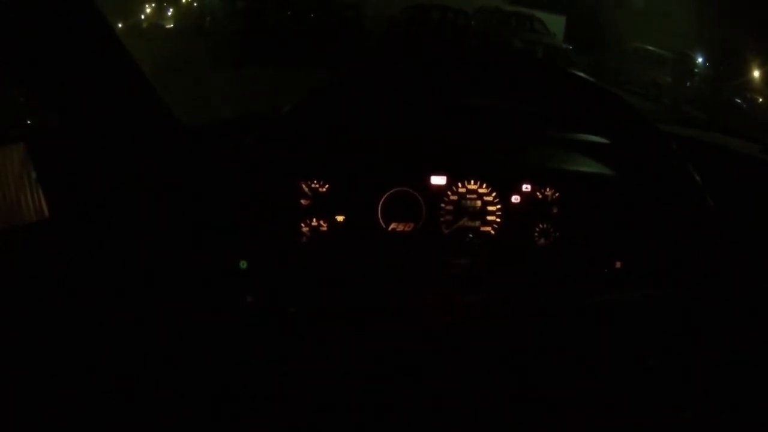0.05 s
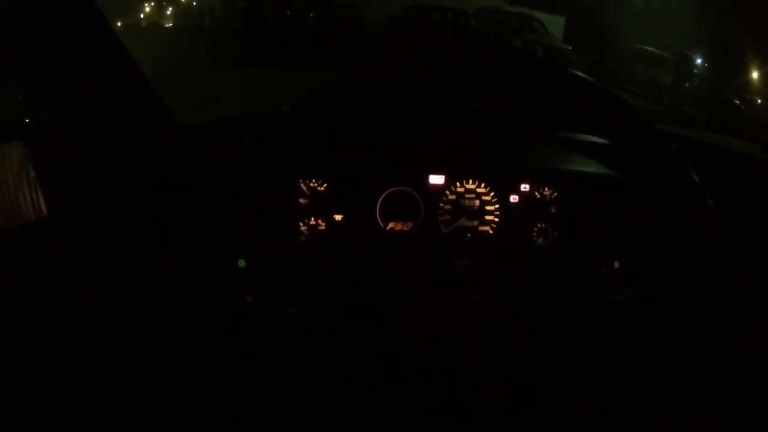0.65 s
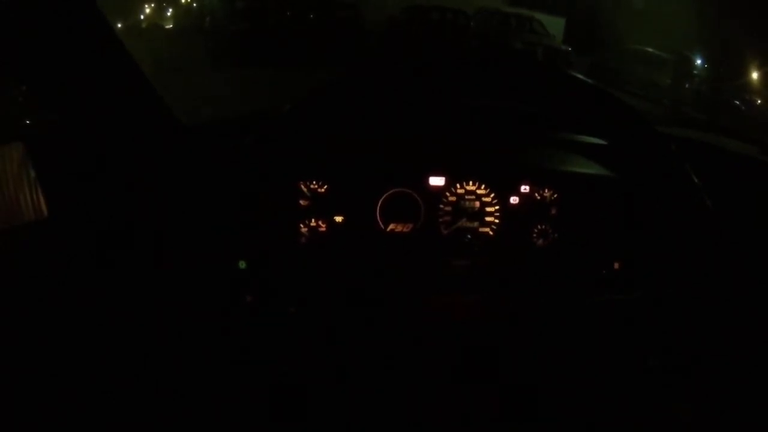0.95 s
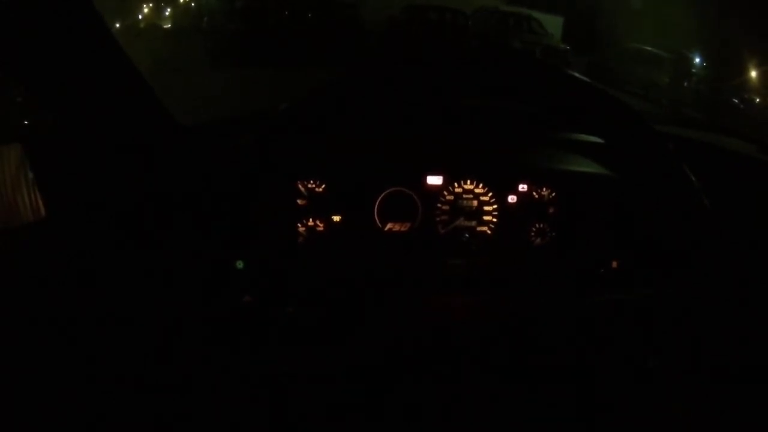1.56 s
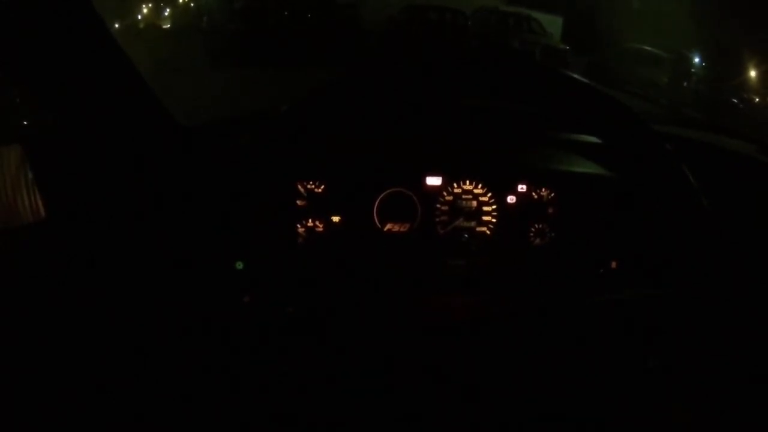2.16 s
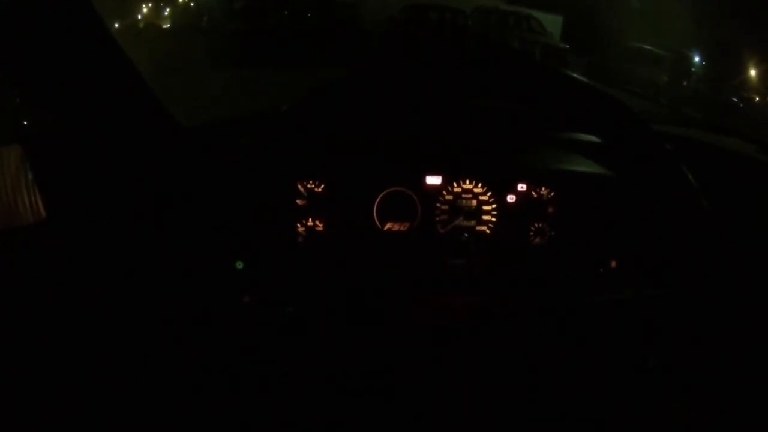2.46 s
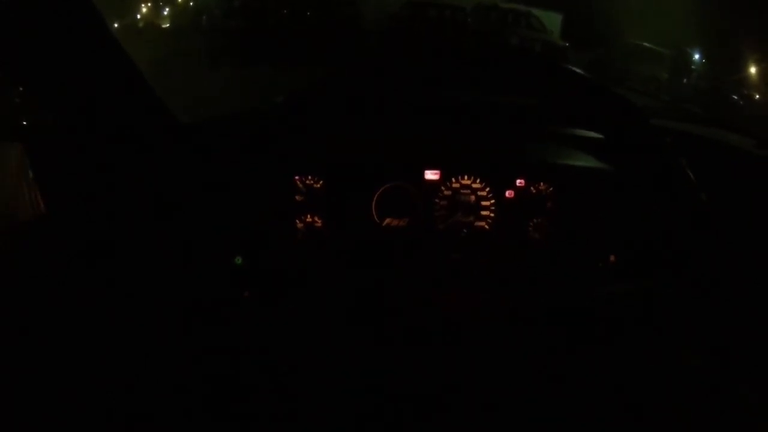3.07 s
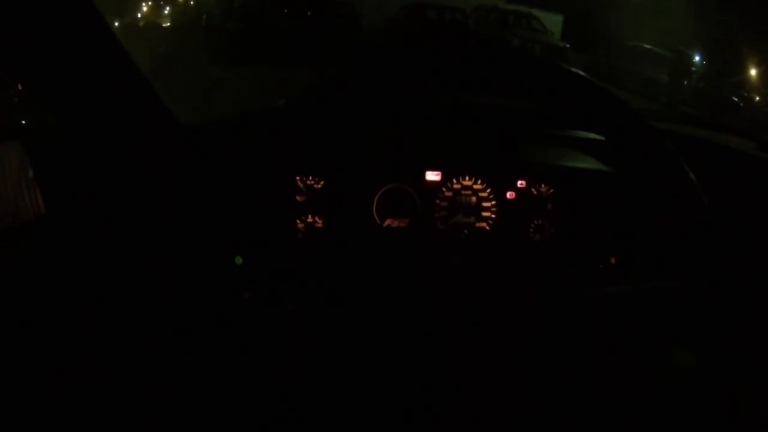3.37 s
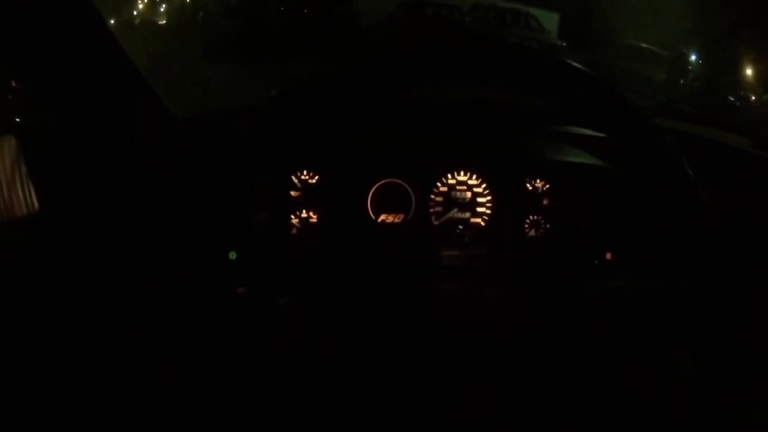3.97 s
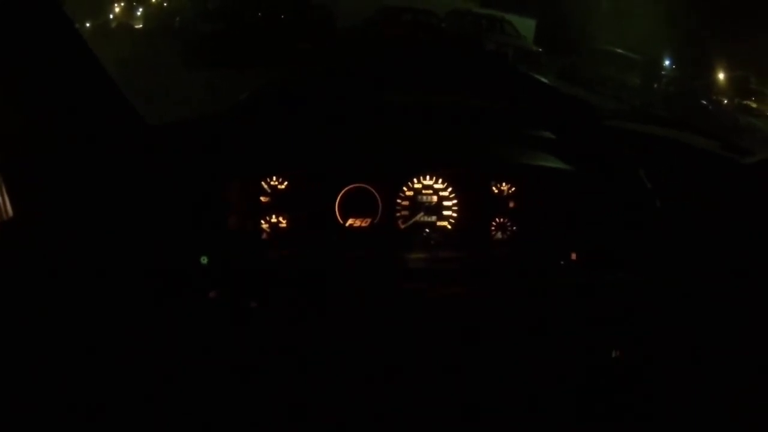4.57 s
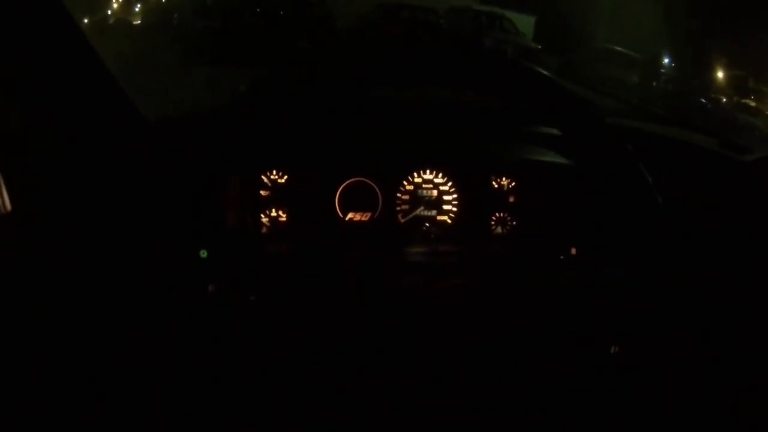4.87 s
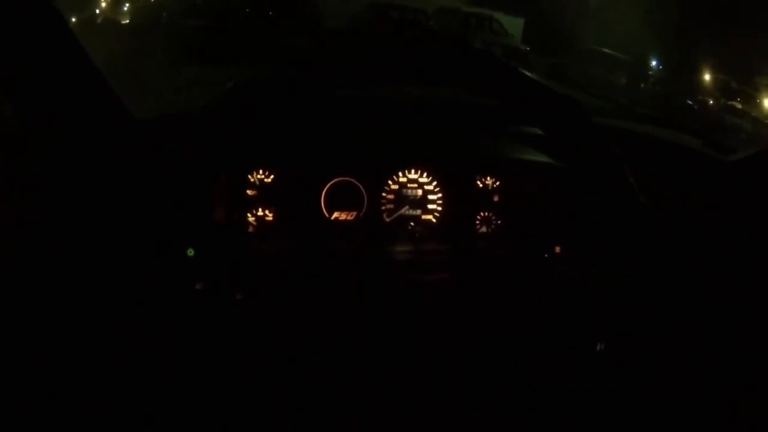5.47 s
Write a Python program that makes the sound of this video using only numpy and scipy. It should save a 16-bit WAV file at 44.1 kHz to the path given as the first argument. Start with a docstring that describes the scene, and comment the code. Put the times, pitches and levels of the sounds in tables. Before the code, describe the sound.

Inside a quiet car, a key turns, the starter cranks, and a diesel engine shudders to life and settles into a low, clattering idle.

```python
"""A faint tick each second over low street rumble, heard from the driver's seat of a closed car.
A key scrapes in the lock and rings the steering column; the starter drones and its gears sing.
The cold four-cylinder diesel stumbles, rocks on its mounts and catches. The key springs back, a relay
snaps, and after one more shudder the engine idles: periodic exhaust pulses make the boom, and the
impacts of combustion make the clatter."""
import sys
import numpy as np
from scipy import signal
from scipy.fft import rfft, irfft
from scipy.io import wavfile
from scipy.ndimage import uniform_filter1d

SR = 44100
rng = np.random.default_rng(int(sys.argv[2]) if len(sys.argv) > 2 else 0)


def transcribe(u):
    """Save the signal u as a 16-bit wav file named by the first command-line argument.

    u: samples, shape (n,) or (channels, n), limited to [-1, 1]; the rate is SR.
    q: integer samples, one column per channel.
    """
    v = np.clip(np.atleast_2d(u).T, -1, 1)
    q = np.round(v * 32767).astype(np.int16)
    wavfile.write(sys.argv[1], SR, q)


N = 243431
T = np.arange(N) / SR
CRANK_S, CATCH_S, RELEASE_S = 2.665, 3.42, 3.73  # starter engages, engine catches, key is let go
KNOCK_FROM_S, SETTLED_S = 4.28, 4.83  # hard knocking begins, idle has evened out


def amp(db):
    """Amplitude ratio of a level in decibels."""
    return 10 ** (np.asarray(db) / 20)


def unit(x):
    """Normalisation to an rms of one."""
    return x / np.sqrt(np.mean(x ** 2) + 1e-20)


def curve(rows):
    """Linear interpolation of (time [s], value) points."""
    return np.interp(T, *np.transpose(rows))


def fade(start, end):
    """Linear ramp, zero at start and one at end; it falls if end comes first."""
    return np.clip((T - start) / (end - start), 0, 1)


def swell(s, width):
    """Gaussian envelope centred on time s."""
    return np.exp(-((T - s) / width) ** 2)


def add(mix, s, sound):
    """Superposition of a sound on the mix at time s."""
    part = mix[max(round(s * SR), 0):][:len(sound)]
    part += sound[:len(part)]


def wander(hz):
    """Random modulation: low-pass noise of unit rms and bandwidth hz."""
    f = np.fft.rfftfreq(N, 1 / SR)
    return unit(irfft(rfft(rng.standard_normal(N)) * np.exp(-(f / hz) ** 2), N))


def grit(spread_db):
    """Impact noise: tiny bursts with log-normal amplitudes."""
    size_db = np.repeat(rng.standard_normal(N // 32 + 1), 32)[:N]
    return unit(rng.standard_normal(N) * amp(spread_db * size_db))


def colour(x, spectrum, tilt_db=0, size=8192):
    """Minimum-phase filter of unit energy, with steep skirts outside the given spectrum."""
    octave = np.log2(np.maximum(abs(np.fft.fftfreq(size, 1 / SR)), 1))
    hz, db = np.transpose(spectrum)
    inside = np.clip(octave, np.log2(hz[0]), np.log2(hz[-1]))
    db = np.interp(octave, np.log2(hz), db) + tilt_db * (inside - inside.mean())
    db -= 24 * abs(octave - inside)
    log_response = np.conj(signal.hilbert(np.log(amp(db) + 1e-5)))
    taps = np.fft.ifft(np.exp(log_response)).real[:size // 2]
    return signal.oaconvolve(x, taps / np.linalg.norm(taps))[:len(x)]


def ring(modes):
    """Modal impulse response: a sum of damped sinusoids."""
    t = np.arange(SR // 2) / SR
    return sum(amp(db - 60 * t / t60) * np.sin(2 * np.pi * hz * t) for hz, db, t60 in modes)


# street noise inside the car: (frequency [Hz], relative level [dB])
STREET_SPECTRUM = [(8.8, -48.5), (15, -3), (54, -2.5), (68, -9.5), (81, -17), (149, -21.5), (167, -25.5),
                   (237, -31.5), (258, -30), (355, -34.5), (1170, -41.5), (1610, -42.5), (6870, -51.5),
                   (11300, -53.5), (15500, -62)]


def background(street_db=-48, whine_hz=11434, whine_db=-72, pulse_hz=59.94, duty=0.36):
    """Transmission loss leaves mainly the lows of the street; a faint high whine pulses above them."""
    gate = (T * pulse_hz + .1) % 1 < duty
    cycles = np.cumsum(whine_hz * (1 + 0.0032 * wander(167))) / SR
    whine = amp(whine_db) * gate * np.sin(2 * np.pi * cycles)
    return amp(street_db) * unit(colour(rng.standard_normal(N), STREET_SPECTRUM)) + whine


def cabin_reverb(x, wet_db=-10, t60=0.078):
    """Reverberation of a small enclosure: dense reflections from glass and trim die quickly."""
    t = np.arange(SR // 4) / SR
    tail = rng.standard_normal(len(t)) * amp(-60 * t / t60) * (t > .002)
    return x + amp(wet_db) * signal.oaconvolve(x, tail / np.linalg.norm(tail))[:N]


# steering column resonances: (frequency [Hz], relative level [dB], T60 [s])
COLUMN_MODES = [(1088, 6.5, 0.032), (1285, -9.5, 0.15), (1730, -33.5, .05), (1994, 2, 0.064),
                (2645, 4, 0.1), (3450, -14, 0.04), (4600, -69, 0.034), (6300, -69, .025)]


def steering_column(contact, ring_share):
    """Forced vibration: contact drives the column's modes, which add to the direct sound."""
    ringing = signal.oaconvolve(contact, ring(COLUMN_MODES))[:N]
    return contact + ring_share * contact.std() * unit(ringing)


def impacts(rows, spectrum, grit_db, ring_share, strike):
    """Impact excitation: an impulse and a decaying scrape ring the steering column."""
    out, scrape, t = np.zeros(N), grit(grit_db), np.arange(SR // 3) / SR
    for s, db, decay, tilt_db in rows:
        burst = scrape[round(s * SR):][:len(t)] * np.exp(-t / decay) + strike * (t == 0)
        add(out, s, amp(db) * colour(burst, spectrum, tilt_db))
    return steering_column(out, ring_share)


# the two beats of a tick: (delay [s], relative level [dB], decay [s], tilt [dB/octave])
TICK_BEATS = [(0, -53, 0.047, -3), (.09, -62.5, 0.0083, -3.5)]
# small stirrings in the cabin: (time [s], relative level [dB], decay [s], tilt [dB/octave])
STIRS = [(.01, -59, 0.15, 2), (.095, -54, .006, 3.5), (0.312, -60.5, 0.071, 0.5),
         (0.474, -48.5, 0.0019, -2), (0.541, -59.5, .015, -4)]
# timbre of both: (frequency [Hz], relative level [dB])
TICK_SPECTRUM = [(300, -15.5), (700, -9.5), (1100, -3.5), (2200, -3.5), (3500, -9.5), (5000, -13),
                 (9000, -17), (15000, -28)]


def ticking(first_s=.064, period_s=1, count=3):
    """Periodic transients: a faint double tick, with a few stray stirrings at the start."""
    beats = [(first_s + k * period_s + delay, *beat)
             for k in range(count) for delay, *beat in TICK_BEATS]
    return amp(-5.5) * impacts(beats + STIRS, TICK_SPECTRUM, grit_db=0, ring_share=0.43, strike=.3)


# knocked keys and fittings: (time [s], frequency [Hz], level [dB], T60 [s])
PINGS = [(.314, 3370, -58, 0.028), (.473, 3320, -47, 0.016), (2.631, 4840, -45, 0.068),
         (2.726, 1150, -28, 0.094), (2.727, 5090, -37.5, 0.023), (3.198, 2070, -31, 0.03),
         (3.779, 3450, -28.5, 0.042), (3.803, 1140, -28, 0.093), (3.868, 2010, -38.5, 0.11)]


def pings():
    """Free vibration: each small struck part rings in a single mode."""
    out = np.zeros(N)
    for s, hz, db, t60 in PINGS:
        add(out, s, ring([(hz, db, t60)]))
    return out


# clicks of key and lock: (time [s], relative level [dB], decay [s], tilt [dB/octave])
KEY_CLICKS = [(2.61, -29, 0.009, 0), (2.631, -28, 0.015, 1.5), (2.727, -28.5, 0.019, -4),
              (2.977, -36, 0.021, -1), (3.02, -34, 0.013, -7.5), (3.099, -38, .013, 2.5),
              (3.137, -40.5, 0.019, 2), (3.198, -36.5, 0.026, -1), (3.709, -30.5, 0.045, 1.5),
              (3.779, -26, 0.0061, -1), (3.803, -25, 0.0063, 0.5), (3.868, -34, 0.015, 0.5)]
# hand movements: (time [s], half width [s], relative scrape level [dB], rustle level [dB])
KEY_TURNS = [(2.49, 0.066, -54, -69), (2.594, 0.044, -44, -55.5), (2.723, 0.057, -38.5, -52),
             (2.84, 0.046, -51, -57), (3.759, 0.057, -30.5, -55)]
# response of the lock: (frequency [Hz], relative level [dB])
LOCK_SPECTRUM = [(410, -25.5), (700, -14.5), (838, -14.5), (1110, 0), (1230, -6), (1330, -2), (1440, -10),
                 (1760, -8), (3100, -17.5), (3430, -13), (3710, -23.5), (4850, -22.5), (5660, -27),
                 (6190, -26), (15000, -52)]


def ignition_key():
    """Impact and sliding friction in the lock ring the column, while the hand rustles."""
    clicks = amp(-4.5) * impacts(KEY_CLICKS, LOCK_SPECTRUM, grit_db=1, ring_share=0.63, strike=1.9)
    friction = sum(amp(db) * swell(s, width) for s, width, db, _ in KEY_TURNS)
    scrape = amp(-4) * colour(friction * grit(2), LOCK_SPECTRUM)
    rustle = sum(amp(db) * swell(s, width) for s, width, _, db in KEY_TURNS) * grit(1.5)
    return clicks + steering_column(scrape, ring_share=0.33) + rustle


# relay snaps: (time [s], relative level [dB], decay [s], tilt [dB/octave])
RELAY_SNAPS = [(3.2888, -24, .002, -1), (4.2168, -21, .0035, 0), (4.2218, -21.5, .0042, -.2)]
# response of the relay: (frequency [Hz], relative level [dB])
RELAY_SPECTRUM = [(450, 5), (580, -3), (720, -14), (900, -1), (1120, 10.5), (1610, 2), (2010, 4.5),
                  (2820, -11.5), (3410, -1.5), (4600, -10.5), (6220, -11.5), (6900, -25.5), (9800, -17.5),
                  (15000, -25)]


def relay():
    """Impulsive excitation: a very brief contact gives a broadband snap."""
    return amp(-1.5) * impacts(RELAY_SNAPS, RELAY_SPECTRUM, grit_db=1.2, ring_share=.22, strike=7)


# thin squeals, perhaps of the cold belt: (time [s], duration [s], frequency [Hz], level [dB])
SQUEALS = [(3.93, .025, 14320, -52), (3.934, 0.013, 7100, -51), (4.163, 0.051, 10500, -63),
           (4.321, 0.043, 10590, -59.5), (4.33, 0.45, 3280, -59.5), (4.475, .065, 7800, -70.5),
           (4.48, 0.19, 4770, -63)]


def squeals(waver=0.012, drift=0.014, flicker=0.32):
    """Random frequency and amplitude modulation make short high tones drift and tremble."""
    out = np.zeros(N)
    warped_time = np.cumsum(1 + waver * wander(360) + drift * wander(12.04)) / SR
    for s, length, hz, db in SQUEALS:
        arch = np.sqrt(np.sin(np.pi * fade(s, s + length)).clip(0))
        out += amp(db) * arch * np.sin(2 * np.pi * hz * warped_time)
    return out * (1 + flicker * wander(45))


# engine speed: (time [s], compression strokes [1/s])
STROKE_RATE = [(2.7, 5), (3.0, 8), (3.2, 13), (3.35, 19), (3.48, 27), (3.65, 29.3), (3.82, 28.1),
               (3.98, 27.6), (4.13, 28.5), (4.28, 32.6), (4.42, 29.9), (4.57, 29.9), (4.72, 29.2),
               (4.9, 29.5), (5.1, 29.75), (5.52, 29.7)]


def strokes(first_cylinder_s=4.989):
    """Phase is the integral of rate: a count of strokes, zero on one of the first cylinder."""
    count = np.cumsum(curve(STROKE_RATE)) / SR
    return count - np.interp(first_cylinder_s, T, count)


def octaves_from_idle():
    """Logarithmic ratio of engine speed to the final idle speed."""
    rate = curve(STROKE_RATE)
    return np.log2(rate / rate[-1])


# dry hiss of cranking: (frequency [Hz], relative level [dB])
HISS_SPECTRUM = [(1500, 12), (3000, 7.5), (4800, 0.5), (6500, -2.5), (7300, 2), (8200, -6), (11000, -8),
                 (15000, -9)]


def starter_hiss(level_db=-53.5, db_per_doubling=4, coast_s=0.63):
    """Broadband noise grows as a power of speed while the key is held, and dies as the starter coasts."""
    held = fade(CRANK_S - .1, CRANK_S) * fade(RELEASE_S + coast_s, RELEASE_S + 0.076)
    gain = amp(level_db + db_per_doubling * octaves_from_idle())
    return gain * held * colour(grit(0.53), HISS_SPECTRUM)


def starter_overrun(top_hz=184, rise_hz_per_s=120, coast_hz_per_s=150, level_db=-31):
    """Pitch follows rotation: the engine spins the starter up until the key is let go; then it coasts."""
    hz = top_hz - np.maximum(rise_hz_per_s * (RELEASE_S - T), coast_hz_per_s * (T - RELEASE_S))
    hum = np.sin(2 * np.pi * np.cumsum(hz * (1 + 0.0294 * wander(30.5))) / SR)
    return amp(level_db) * swell(RELEASE_S, width=0.26) * (1 + .45 * wander(30)) * hum


# starter rotation: (time [s], speed factor [1])
STARTER_SPEED = [(2.68, .95), (2.8, 1.02), (2.92, 1.01), (3.03, 1.15), (3.3, 1.23)]
# gear tones: (frequency at speed factor one [Hz], relative level [dB])
GEAR_TONES = [(237, -32), (721, -51.5), (958, -52), (1028, -45.5)]
# grinding of the teeth: (frequency [Hz], relative level [dB])
RASP_SPECTRUM = [(900, 5), (1050, 9), (1300, 4), (1420, -3), (1900, -11), (2450, 4.5), (2800, -13),
                 (5000, -42)]
# load peaks against a compression: (time [s], half width [s], gain [dB])
COMPRESSIONS = [(2.857, 0.053, -3.5), (3.031, 0.022, -6.5)]


def starter(flutter=0.0221, drone_hz=50, drone_db=-26, chug=0.45):
    """Gear meshing gives tones and rasp that swell with load; the labouring motor drones unevenly."""
    warped_time = np.cumsum(curve(STARTER_SPEED) * (1 + flutter * wander(110))) / SR
    gears = sum(amp(db) * (1 + .5 * wander(41)) * np.sin(2 * np.pi * hz * warped_time)
                for hz, db in GEAR_TONES)
    rasp = amp(-43) * colour(grit(1.3), RASP_SPECTRUM)
    load = amp(-17) * fade(CRANK_S, CRANK_S + 0.03) * fade(RELEASE_S, CATCH_S)
    load += sum(amp(db) * swell(s, width) for s, width, db in COMPRESSIONS)
    drone = (1 + chug * wander(34)) * np.sin(2 * np.pi * drone_hz * T)
    drone *= fade(2.72, 2.76) * fade(3.01, 2.985)
    return load * (np.sqrt(2) * gears + rasp) + np.sqrt(2) * amp(drone_db) * drone


# engine effort, sagging as the governor cuts back after the catch: (time [s], relative level [dB])
EFFORT = [(2.68, -6), (2.755, 4), (2.81, -1.5), (2.94, -7), (3.03, -2), (3.25, -1.5), (3.4, 1.5),
          (3.8, -1.5), (4.0, -0.5), (4.2, -4.5), (4.3, -.5), (4.9, 1), (5.5, -0.5)]


def judder(band_hz=(20, 125), level_db=-32, db_per_doubling=2):
    """Random low vibration grows with speed and effort, from the first crank until the idle settles."""
    bandpass = signal.butter(3, band_hz, "band", fs=SR, output="sos")
    shake = unit(signal.sosfilt(bandpass, rng.standard_normal(N)))
    running_rough = fade(CRANK_S + 0.052, CRANK_S + 0.086) * fade(SETTLED_S, SETTLED_S - .4)
    db = level_db + 0.57 * curve(EFFORT) + db_per_doubling * octaves_from_idle()
    return amp(db) * shake * running_rough


# booming cabin resonances: (frequency [Hz], relative level [dB], T60 [s])
CABIN_MODES = [(19.8, 2, 0.12), (47.2, 5.5, 0.25), (63.67, -30, 0.11), (108, -23, 0.26)]
# bouts of rocking: (start [s], end [s], gain of first jolt [dB], gain at end [dB])
SHUDDERS = [(3.117, 3.317, -16.5, -16), (3.358, 3.57, -11.5, -10), (4.276, 4.6, -10.5, -26)]


def shudder(period_s=.0601, jitter_s=0.0019, uneven_db=4.5):
    """Cavity resonance: each jolt of the engine rocking on its mounts excites the cabin's modes."""
    out, boom = np.zeros(N), -ring(CABIN_MODES)
    for start, end, first_db, last_db in SHUDDERS:
        for s, (late, hard) in zip(np.arange(start, end, period_s), rng.standard_normal((20, 2))):
            db = np.interp(s, (start, end), (first_db, last_db)) + uneven_db * hard
            add(out, s + jitter_s * late, amp(db) * boom)
    out -= uniform_filter1d(out, size=5000)  # the cabin leaks: no lasting pressure
    return amp(-3) * signal.sosfilt(signal.butter(2, 260, fs=SR, output="sos"), out)


# unequal strength of the four cylinders: (relative level [dB])
CYLINDERS_DB = [-2, -3.1, -4.6, -6.4]


def throb(phase, lag, rise, decay, floor, uneven_db=1):
    """Pulse envelope, varying by cylinder and by chance; lag, rise and decay are shares of a stroke."""
    stroke, age = np.divmod(phase - lag, 1)
    stroke = stroke.astype(int)
    db = np.take(CYLINDERS_DB, stroke, mode="wrap") + uneven_db * rng.standard_normal(N)[stroke]
    return unit(floor + amp(db) * (1 - np.exp(-age / rise)) * np.exp(-age / decay))


# bodywork rumble before its low cut: (frequency [Hz], relative level [dB])
RUMBLE_SPECTRUM = [(41, -54), (70, 13), (113, 3), (238, -15.5), (293, -23.5), (343, -23), (495, -26.5),
                   (587, -32.5), (656, -27.5), (890, -41), (1110, -36), (1210, -44.5), (1300, -46),
                   (1690, -83), (2860, -120)]
# clatter through the bulkhead: (frequency [Hz], relative level [dB])
CLATTER_SPECTRUM = [(500, -2.5), (800, 3), (1150, 5.5), (1450, 3), (1900, 4.5), (2600, 0), (3200, -11),
                    (3900, -13.5), (5400, -15), (7000, -21), (10000, -25), (15000, -30)]


def engine_block(phase, rumble_db=-35.5, clatter_db=-49.5, low_cut_hz=215):
    """Structure-borne sound: each stroke shakes the bodywork and clatters, in step with the effort."""
    shake = throb(phase, lag=.12, rise=.12, decay=.45, floor=.3)
    burn = throb(phase, lag=.17, rise=.2, decay=.31, floor=.14)
    rumble = colour(rng.standard_normal(N) * shake, RUMBLE_SPECTRUM)
    rumble = unit(signal.sosfilt(signal.butter(5, low_cut_hz, "high", fs=SR, output="sos"), rumble))
    clatter = colour(grit(0.5) * burn, CLATTER_SPECTRUM)
    drive = fade(CRANK_S, CRANK_S + 0.021) * amp(curve(EFFORT))
    return drive * (amp(rumble_db) * rumble + amp(clatter_db) * clatter)


# knock of each cold cylinder at idle: (level [dB])
KNOCK_DB = [-45.5, -51, -59.5, -49.5]
# the block's response to a late burn: (frequency [Hz], relative level [dB])
KNOCK_SPECTRUM = [(600, 15), (1100, -17), (1450, 6), (2000, -1.5), (2350, 6), (2680, 7.5), (2950, 2),
                  (3200, 6), (3900, -22), (4800, -30), (5450, -25), (6200, -45), (9000, -43.5),
                  (15000, -32.5)]
# bright edge of a hard knock: (frequency [Hz], relative level [dB])
EDGE_SPECTRUM = [(4700, 1.5), (5450, 2.5), (6100, -14.5)]


def diesel_knock(phase, early_db=-51, uneven_db=1, lag=.16, rise=.21):
    """Ignition delay: a late burn rings the block once a stroke; at idle one cylinder knocks hardest."""
    stroke, age = np.divmod(phase - lag, 1)
    stroke = stroke.astype(int)
    settled = fade(SETTLED_S - .05, SETTLED_S)
    db = (1 - settled) * early_db + settled * np.take(KNOCK_DB, stroke, mode="wrap")
    strength = amp(db + uneven_db * rng.standard_normal(N)[stroke]) * (T > KNOCK_FROM_S)
    pulse = strength * age / rise * np.exp(1 - age / rise)
    edge = amp(-13 - max(KNOCK_DB)) * pulse ** 2  # square law: harder knocks are brighter
    body = colour(pulse * grit(3.9), KNOCK_SPECTRUM, tilt_db=1.7)
    return body + colour(edge * grit(2.36), EDGE_SPECTRUM)


# exhaust overtones: (multiple of the firing rate [1], relative level [dB])
EXHAUST_HARMONICS = [(2, 7.5), (3, 4), (4, -3), (5, -9), (6, -9.5), (7, -14.5), (8, -11), (9, -24),
                     (10, -25.5), (11, -20.5), (12, -20), (13, -23.5), (14, -26)]


def exhaust(phase, boom_hz=29.99, half_width_hz=1.03, boom_db=-15, rough=0.18, sway=0.0033):
    """Harmonic series on the firing rate: the fundamental booms near a resonance, the overtones waver."""
    resonance = amp(boom_db) / np.hypot(1, (curve(STROKE_RATE) - boom_hz) / half_width_hz)
    fundamental = resonance * np.cos(2 * np.pi * phase)
    overtones = np.zeros(N)
    for k, db in EXHAUST_HARMONICS:
        cycles = k * (phase + sway * wander(6.9)) + rng.random()
        overtones += amp(db) * (1 + rough * wander(11.6)) * np.cos(2 * np.pi * cycles)
    unsettled_db = 1.5 * fade(SETTLED_S, KNOCK_FROM_S)  # overtones soften as the idle settles
    overtones *= amp(-35.5 + 0.34 * curve(EFFORT) + unsettled_db)
    return np.sqrt(2) * fade(CATCH_S - .03, CATCH_S + 0.032) * (fundamental + overtones)


def scene():
    """Superposition of all sources in mono; only the small mechanisms by the wheel reverberate."""
    phase = strokes()
    mechanisms = ignition_key() + relay() + ticking() + pings()
    engine = exhaust(phase) + engine_block(phase) + diesel_knock(phase)
    engine += shudder() + judder() + squeals()
    cranking = starter() + starter_overrun() + starter_hiss()
    return (engine + cranking + cabin_reverb(mechanisms) + background())[None]


def record(dry):
    """Band limiting: a linear-phase low-pass at 15.4 kHz."""
    lowpass = signal.firwin(511, 15400, window=("kaiser", 9), fs=SR)
    return signal.oaconvolve(dry, lowpass[None], "same")


dry = scene()
out = record(dry)
transcribe(out)
```